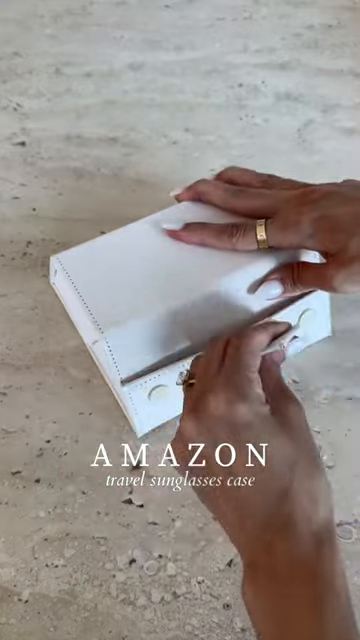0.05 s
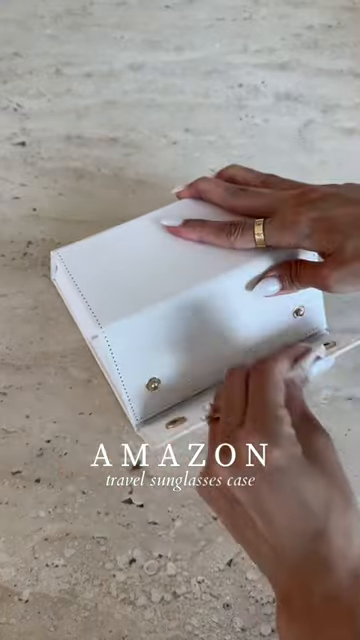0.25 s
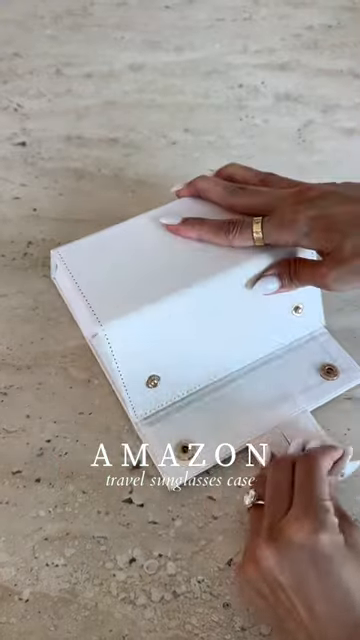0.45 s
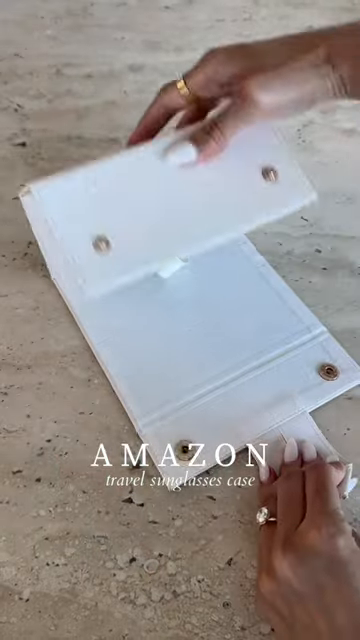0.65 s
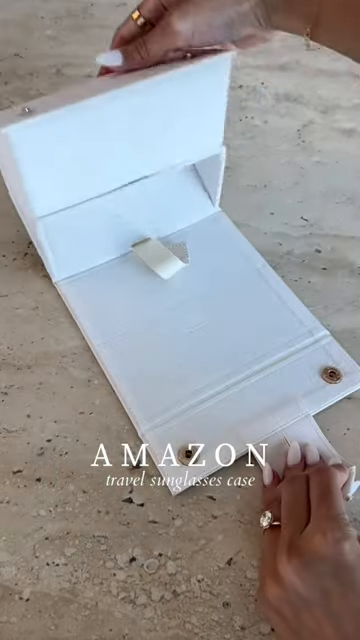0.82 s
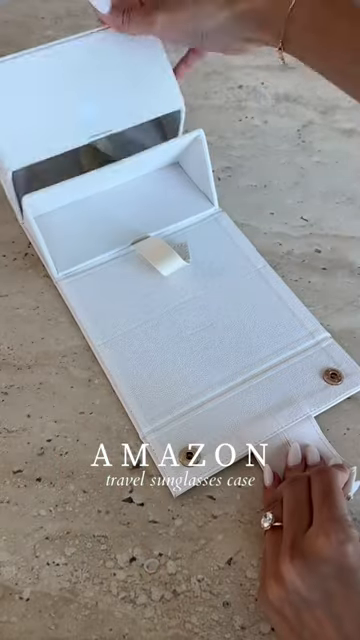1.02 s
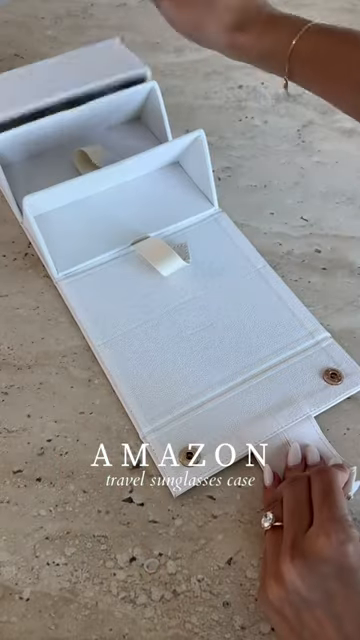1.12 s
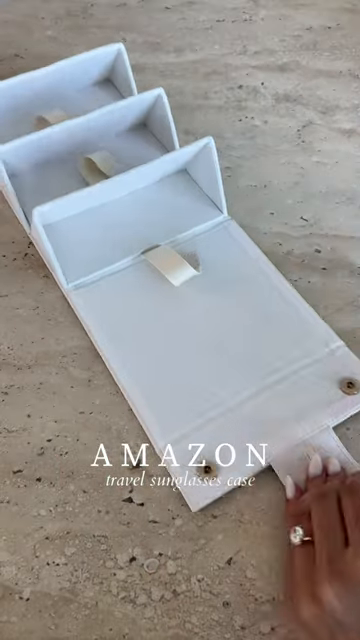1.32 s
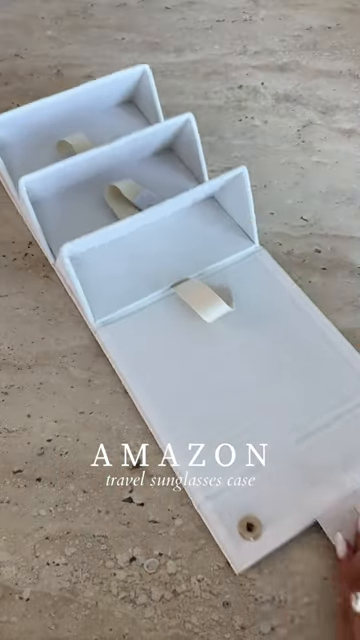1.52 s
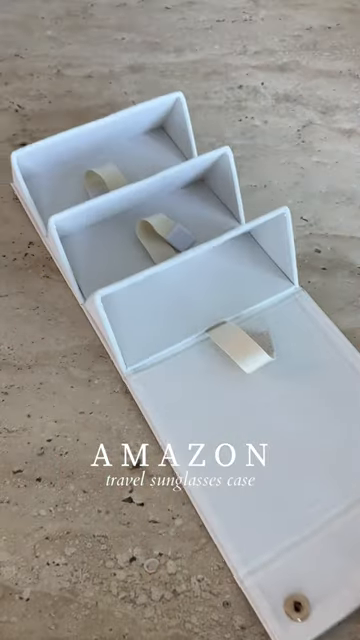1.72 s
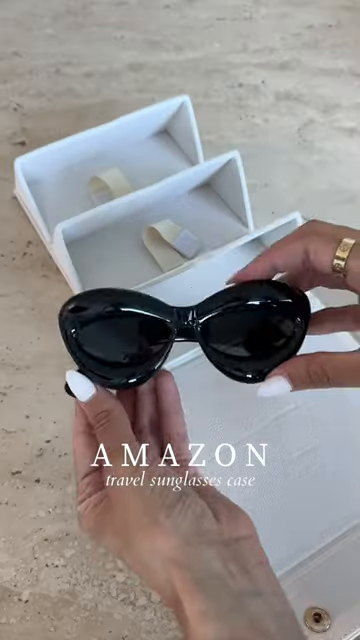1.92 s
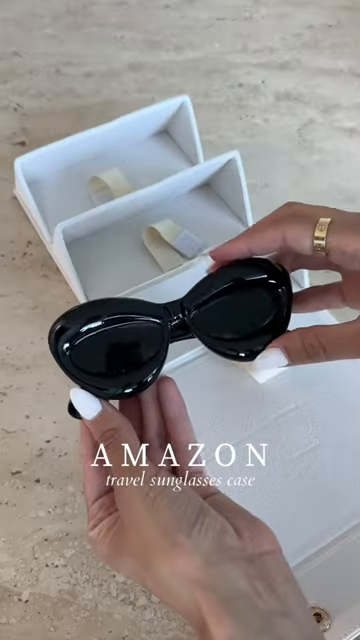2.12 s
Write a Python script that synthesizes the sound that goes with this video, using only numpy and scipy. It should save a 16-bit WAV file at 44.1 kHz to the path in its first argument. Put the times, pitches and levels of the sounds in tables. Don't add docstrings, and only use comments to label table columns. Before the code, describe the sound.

Two metal snaps on a stiff hollow case pop open: a loud sharp click with a thump at 0.22 s, a lighter one at 0.37, faint ticks near 0.5. Quiet rubbing follows from 0.65, a soft tap at 0.95, firm knocks at 1.16 and 1.23 as compartments unfold. A soft gritty slide on stone runs 1.32-1.8, then near silence. Close phone microphone, short bare-room tails cut between shots.

```python
import sys
import numpy as np
from scipy import signal
from scipy.fft import rfft, irfft, next_fast_len
from scipy.io import wavfile
from scipy.ndimage import map_coordinates

SR = 44100
rng = np.random.default_rng(int(sys.argv[2]) if len(sys.argv) > 2 else 0)


def gain_from_db(level_db):
    decades = np.asarray(level_db, float) / 20
    return 10 ** decades


def dump(signal):
    limited = np.clip(np.atleast_2d(signal).T, -1, 1)
    pcm = np.round(limited * 32767).astype(np.int16)
    wavfile.write(sys.argv[1], SR, pcm)


N = 94815
T = np.arange(N) / SR


def unit(x):
    return x / np.sqrt(np.mean(x ** 2) + 1e-20)


def along(points, hz):
    f, value = np.transpose(points)
    return np.interp(np.log(hz + 1), np.log(f + 1), value)


def filtered(x, response):
    n = x.shape[-1]
    padded = next_fast_len(n + 8192)
    spectrum = rfft(x, padded) * response(np.fft.rfftfreq(padded, 1 / SR))
    return irfft(spectrum, padded)[..., :n]


def peaks(rows):
    def response(f):
        total = 0
        for k, (center, width, db) in enumerate(rows):
            damping = 1j * f * width
            total = total + (-1) ** k * gain_from_db(db) * damping / (center * center - f * f + damping)
        return total
    return response


def wobble(rate):
    knots = rng.standard_normal(int(N * rate / SR) + 4)
    return map_coordinates(knots, [T * rate])


def swell(start, length):
    u = np.clip((T - start) / length, 0, 1)
    return np.abs(np.sin(np.pi * u ** .7)) ** 1.5


def clicks():
    # (time [s], peak level [dB], pitch [Hz], t60 [s], metal share [dB])
    hits = [(0.2199, -33, 1560, 0.0064, -12.5), (0.2224, -12, 3520, .006, 5),
            (0.2282, -8.5, 8100, 0.0089, -9.5), (0.229, -10.5, 3000, .006, -4.5),
            (.3720, -14.5, 5720, .005, -7.5), (0.3733, -26, 2300, 0.018, -1),
            (0.3766, -20.5, 2010, .012, 0), (0.3821, -20, 5570, 0.0038, -1),
            (0.4909, -36, 5320, 0.0069, -9.5), (.494, -39.5, 2274, 0.012, -13.5),
            (0.513, -69.5, 4097, 0.005, -3), (0.5766, -45.5, 7000, 0.018, 4),
            (0.9474, -43.5, 5660, 0.011, -1.5), (0.9492, -36.5, 2315, .008, -12),
            (0.9721, -44, 5360, 0.014, 1.5), (0.9749, -46, 1840, 0.0079, -19.5),
            (1.163, -28, 1940, 0.007, -7), (1.2324, -11, 6640, .006, -15.5),
            (1.2325, -18.5, 2400, 0.021, -0.5), (2.08, -62, 3540, 0.004, -11),
            (2.101, -54.5, 4470, .006, -7)]
    # (frequency [Hz], width [Hz], level [dB])
    snap_body = [(2600, 1800, -4), (6300, 940, -15.5), (9200, 3100, -7.5), (15900, 830, -23)]
    pitch_q = 1.6
    t = np.arange(900) / SR
    out = np.zeros(N + len(t))
    for s, db, hz, t60, metal_db in hits:
        burst = rng.standard_normal(len(t)) * gain_from_db(-60 * t / t60)
        burst[0] = -3
        own_pitch = peaks([(hz, hz / pitch_q, 0)])
        ring = filtered(burst, lambda f: own_pitch(f) ** 2)
        ring = ring + gain_from_db(metal_db) * filtered(burst, peaks(snap_body))
        out[round(s * SR):][:len(t)] += gain_from_db(db) * ring / np.abs(ring).max()
    return out[:N]


def knocks():
    # (time [s], peak level [dB], pitch [Hz], t60 [s])
    blows = [(0.223, -7.5, 538, .025), (0.2227, -19.5, 1650, .012), (0.2286, -1, 2600, 0.0037),
             (.2296, -7, 610, 0.025), (0.23, -11.5, 1063, 0.014), (.230, -14.5, 787.7, 0.031),
             (0.23, -16, 269, 0.032), (.232, -20.5, 219.4, 0.11), (0.38, -23.5, 291, .03),
             (0.58, -37, 560, 0.016), (.952, -29.5, 700, 0.013), (.955, -28, 216, 0.047),
             (.953, -41.5, 383, .04), (.965, -39.5, 140.9, 0.23), (.985, -40, 387, 0.09),
             (1.003, -41.5, 600, 0.034), (1.019, -52, 250, .08), (1.165, -15, 416.8, 0.032),
             (1.166, -24, 745, 0.028), (1.173, -29, 140.3, 0.18), (1.175, -29.5, 214, 0.17),
             (1.234, -13, 927, 0.016), (1.24, -25.5, 138.9, .13)]
    # (ratio to pitch, level [dB])
    wall_modes = [(1, 0), (.7, -12), (1.3, -13), (2.4, -22)]
    rise_cycles = 0.52
    out = np.zeros(N + SR)
    t = np.arange(SR // 3) / SR
    for s, db, hz, t60 in blows:
        ring = np.zeros(len(t))
        for ratio, level in wall_modes:
            decay = gain_from_db(level - 60 * t * ratio ** .5 / t60)
            ring += decay * np.sin(2 * np.pi * hz * ratio * t)
        soft_rise = 1 - np.exp(-t * hz / rise_cycles)
        out[round(s * SR):][:len(t)] -= gain_from_db(db) * ring * soft_rise
    return out[:N]


def slide():
    # (time [s], level [dB])
    pressure = [
        (1.32, -38),
        (1.328, -51.5),
        (1.374, -45),
        (1.388, -45),
        (1.498, -43),
        (1.684, -45),
        (1.792, -64),
        (1.866, -93),
        (1.87, -92),
    ]
    # (frequency [Hz], level per Hz [dB])
    scrape = [(60, -17.5), (130, -4), (500, -9.5), (1200, -6), (5300, -14.5), (9600, -14.5), (11500, -40.5),
              (15000, -23.5), (16500, -42)]
    # (frequency [Hz], width [Hz], level [dB])
    case_modes = [(790, 80, 6), (1165, 100, 13), (2050, 250, 4), (3000, 350, 5), (5300, 1200, 4),
                  (15000, 900, 14)]
    grain_db = 2.1 * rng.standard_normal(N // 40 + 1).repeat(40)[:N]
    grit = rng.standard_normal(N) * gain_from_db(grain_db + wobble(40))
    body = peaks(case_modes)
    sound = unit(filtered(grit, lambda hz: gain_from_db(along(scrape, hz)) * (1.3 + np.abs(body(hz)))))
    s, db = np.transpose(pressure)
    return sound * gain_from_db(np.interp(T, s, db, -120, -120))


def rubs():
    # (start [s], length [s], level [dB], pitch [Hz])
    strokes = [(0, 0.079, -83.5, 2309), (0.632, 0.11, -81, 5400), (.70, .08, -76, 3800),
               (0.647, .17, -74.5, 745), (0.86, 0.12, -72.5, 6300), (0.882, 0.21, -70.5, 556),
               (0.881, 0.067, -83, 1814), (0.941, .07, -71, 4380), (0.953, 0.038, -57, 1600),
               (1.145, 0.0426, -52, 1100), (1.154, 0.064, -61, 5630), (1.211, .04, -47.5, 6500),
               (1.233, 0.071, -41, 6500), (0.48, 0.18, -64, 6723), (0.501, 0.059, -68, 9020),
               (1.682, .15, -62, 352), (2.06, 0.098, -83.5, 5600)]
    rub_q = 0.99
    out = np.zeros(N)
    for s, length, db, hz in strokes:
        grain = rng.standard_normal(N) * gain_from_db(3 * wobble(280))
        pitch = peaks([(hz, hz / rub_q, 0)])
        out += gain_from_db(db) * swell(s, length) * unit(filtered(grain, lambda f: pitch(f) ** 2))
    return out


def floor_shake():
    # (start [s], length [s], level [dB])
    shakes = [
        (0.65, 0.3, -59.5),
        (1.4, 0.15, -58.5),
        (0.2, .08, -64.5),
    ]
    mode = peaks([(35, 40, 0)])
    low = unit(filtered(rng.standard_normal(N), lambda hz: np.abs(mode(hz)) ** 2))
    return low * sum(gain_from_db(db) * swell(s, length) for s, length, db in shakes)


def two_ports(near):
    # (frequency [Hz], phase [rad])
    lead = [(100, .05), (250, .25), (550, .65), (2000, .45), (5000, 1.0), (9000, 1.9), (14000, 2.3)]
    return filtered(near, lambda hz: np.exp(.5j * np.outer([1, -1], along(lead, hz))))


def spread(pair):
    # (frequency [Hz], share of diffuse sound)
    side_share = [(30, 0.21), (120, 0.082), (250, .2), (500, 0.78), (2000, .4), (6000, 1), (12000, .9)]
    mid, side = filtered(pair, lambda hz: [hz * 0 + 1, np.abs(along(side_share, hz))])
    return np.array([mid + side, mid - side])


def room(x):
    # (frequency [Hz], t60 [s])
    decay = [(100, 0.72), (500, 0.51), (2500, 0.57), (6000, 0.31), (12000, 0.27)]
    # (frequency [Hz], level [dB])
    tail_colour = [(100, 5), (700, 2), (3000, 0.5), (7000, -0.5), (10000, -5.5), (11500, -33.5)]
    hz, t, z = signal.stft(rng.standard_normal((2, SR)), SR, nperseg=256)
    tail_db = along(tail_colour, hz)[:, None] - 60 * t / along(decay, hz)[:, None]
    tail = spread(signal.istft(z * gain_from_db(tail_db), SR, nperseg=256)[1])
    late = np.pad(x, (260, 0))[None]
    return signal.fftconvolve(late, tail / np.linalg.norm(tail[0]), axes=1)[:, :N]


def room_hush():
    # (frequency [Hz], level per Hz [dB])
    hush_colour = [(12, -57.5), (20, -28.5), (35, -9.5), (60, -2.5), (422, -31), (1480, -37), (1910, -40.5),
                   (2320, -44), (16000, -58)]
    level = gain_from_db(-67 + wobble(8))
    noise = filtered(rng.standard_normal((2, N)), lambda hz: gain_from_db(along(hush_colour, hz)))
    return level * unit(spread(noise))


def scene():
    # (start [s], end [s], fade-in [s])
    shots = [
        (0, .5935, .001),
        (.621, .864, .012),
        (.864, 1.312, .003),
        (1.320, 1.868, .012),
        (1.868, 2.2, .006),
    ]
    wet_levels = [-14, -13.5, -16, -14.5, -21]
    near = clicks() + knocks() + slide() + rubs() + floor_shake()
    hush = room_hush()
    direct = two_ports(near)
    out = gain_from_db(-6) * hush * (T > shots[0][1]) * (T < .6165)
    for (start, end, fade), wet_db in zip(shots, wet_levels):
        inside = (T >= start) & (T < end)
        fade_in = np.clip((T - start) / fade, 0, 1)
        fade_out = np.clip((end - T) * 2000, 0, 1)
        heard = direct + hush + gain_from_db(wet_db) * room(near * inside)
        out += inside * fade_in * fade_out * heard
    return out + gain_from_db(-32) * hush


def band_limit(x):
    return signal.sosfilt(signal.butter(12, 16800, fs=SR, output="sos"), x)


def record(dry):
    # (frequency [Hz], level [dB])
    mic_colour = [(20, -6.5), (60, 2), (7000, 2), (9000, -5.5), (11500, -17), (14500, -3), (16500, -7.5)]
    mix = filtered(dry, lambda hz: gain_from_db(along(mic_colour, hz)))
    return band_limit(mix)


dry = scene()
out = record(dry)
dump(out)
```